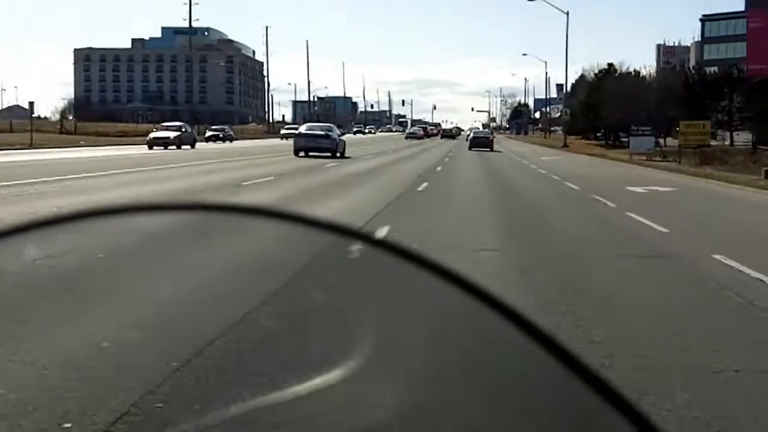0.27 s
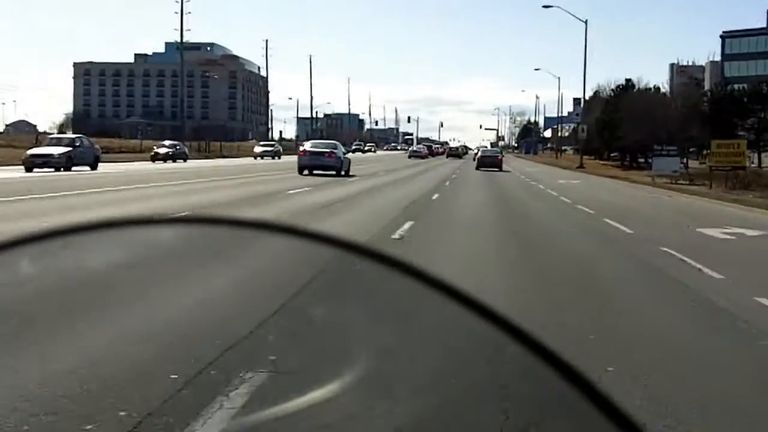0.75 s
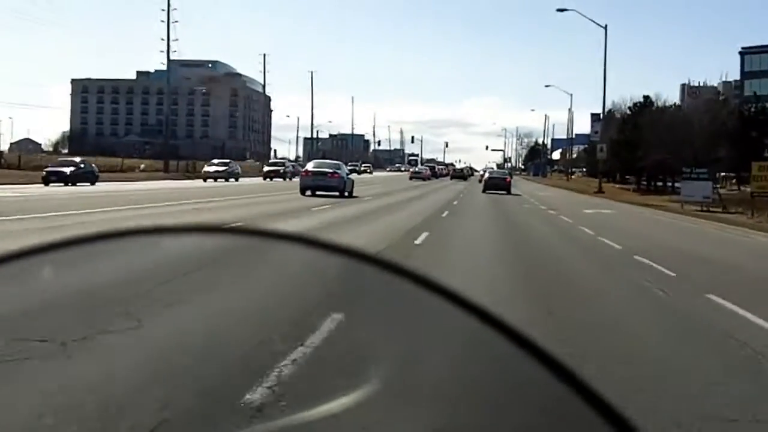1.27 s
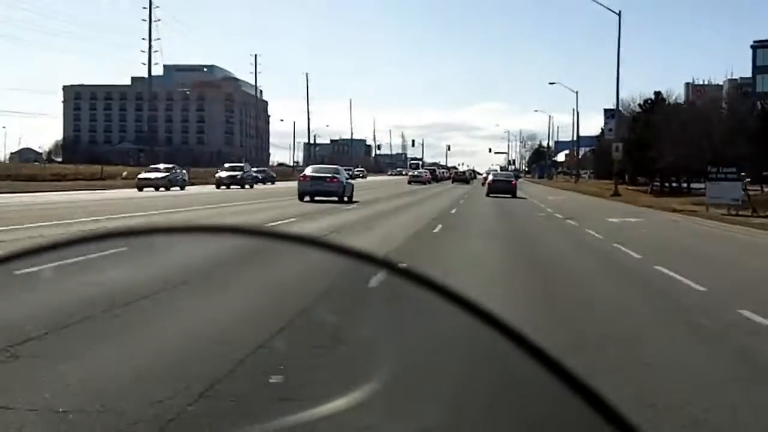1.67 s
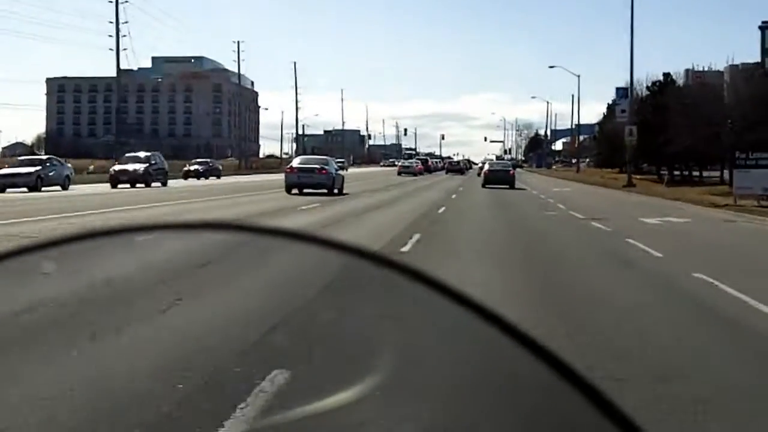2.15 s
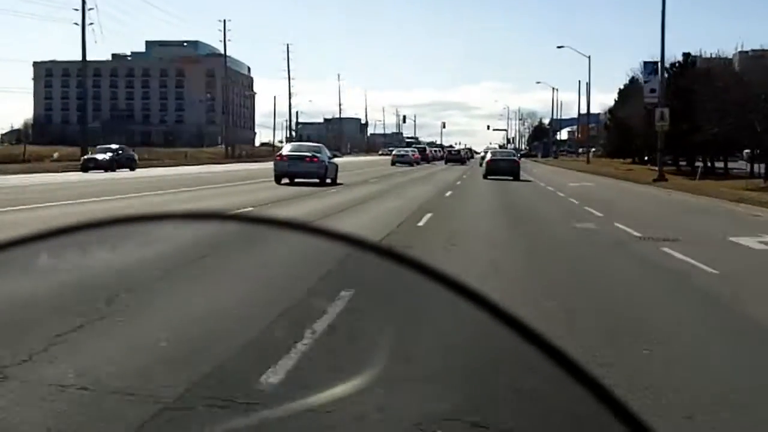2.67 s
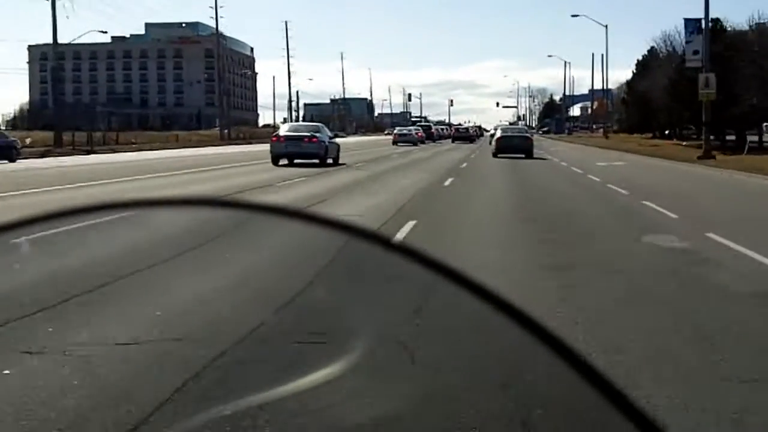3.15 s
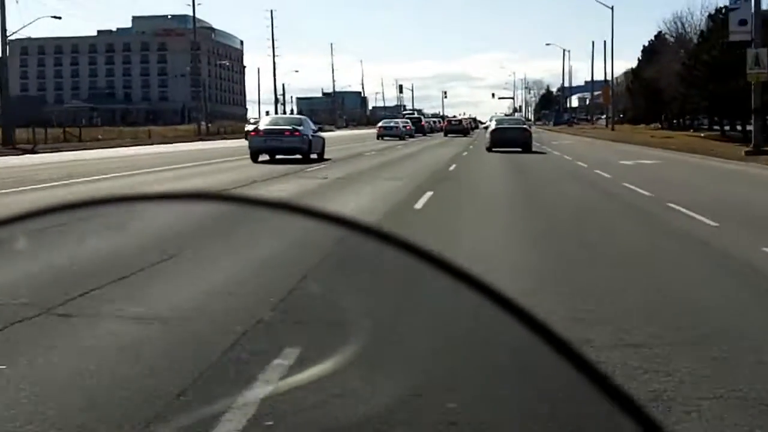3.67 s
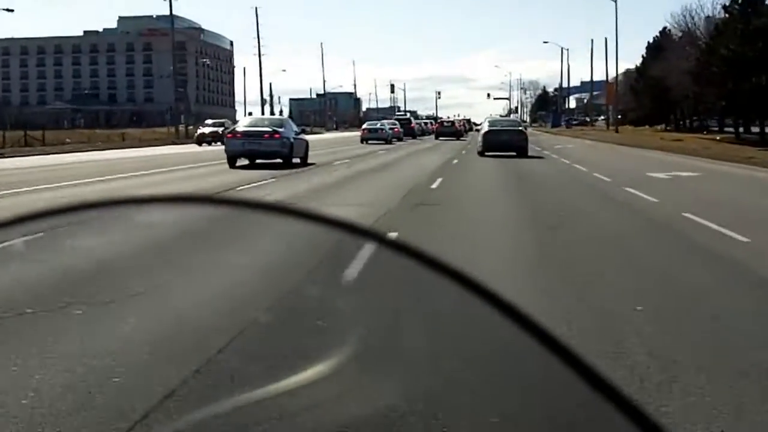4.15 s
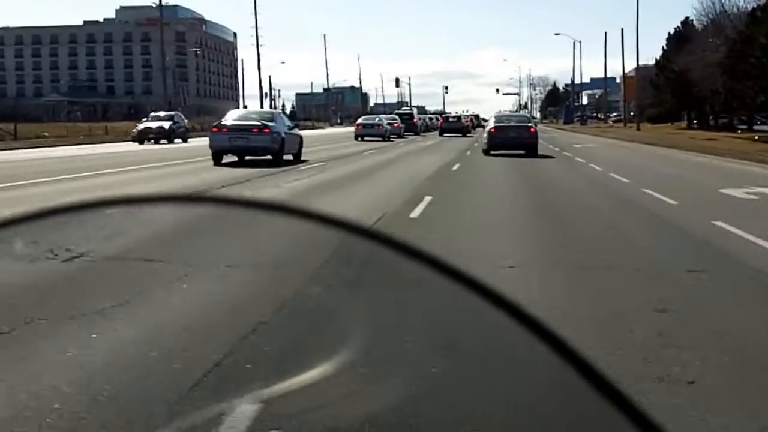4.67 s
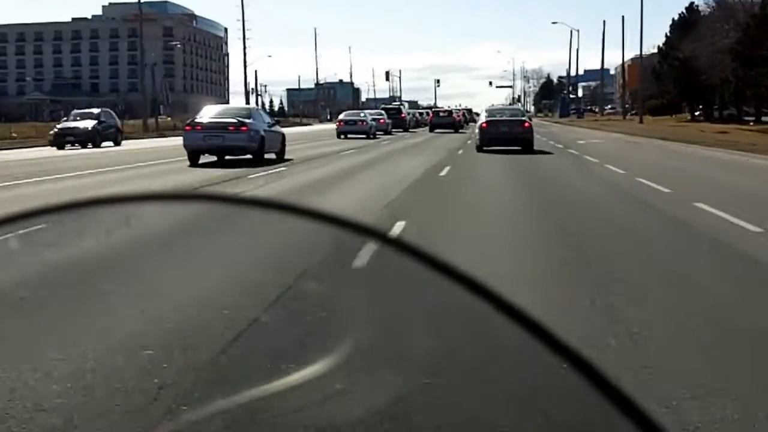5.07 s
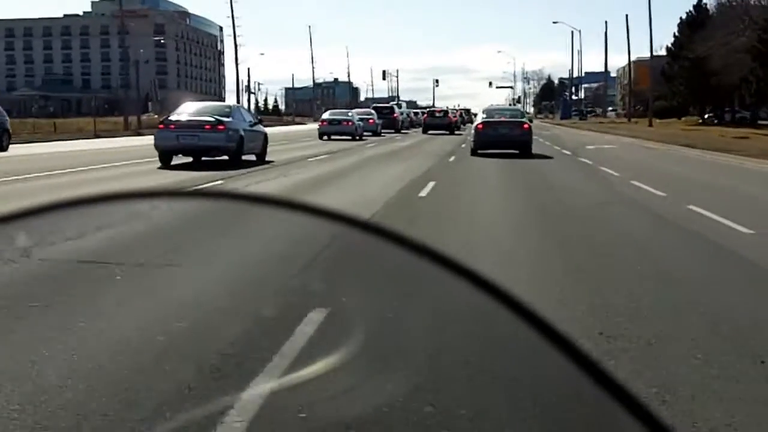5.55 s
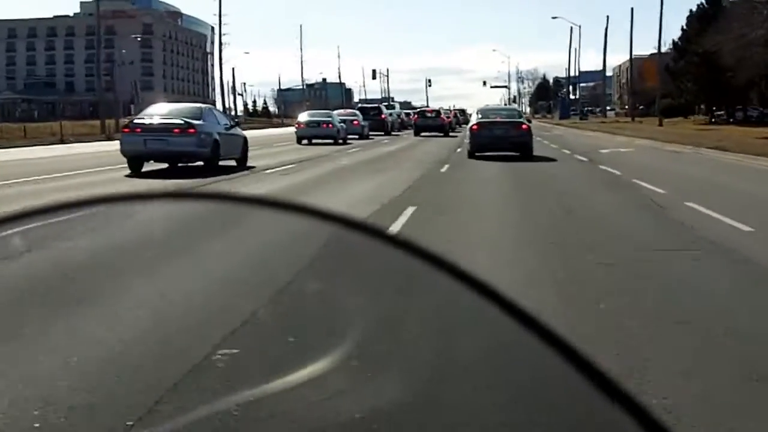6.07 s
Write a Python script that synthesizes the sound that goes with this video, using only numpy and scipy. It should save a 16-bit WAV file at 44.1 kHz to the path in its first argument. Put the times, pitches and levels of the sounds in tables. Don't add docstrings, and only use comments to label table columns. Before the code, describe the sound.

A four-cylinder motorcycle booms and growls at cruise, then slows on a closed throttle, its pitch sinking while wind buffets the microphone.

```python
import sys
import numpy as np
from scipy import signal
from scipy.fft import rfft, irfft, next_fast_len
from scipy.io import wavfile
from scipy.ndimage import uniform_filter1d, map_coordinates

SR = 44100
rng = np.random.default_rng(int(sys.argv[2]) if len(sys.argv) > 2 else 0)


def volts(x):
    e = np.asarray(x, float) / 20
    return 10 ** e


def persist_wave(psi):
    counts = np.round(np.clip(psi, -1, 1) * 32767).astype(np.int16)
    wavfile.write(sys.argv[1], SR, np.atleast_2d(counts).T)


N = 278271
T = np.arange(N) / SR

# [pitch_hz, level_db per Hz]
BODYWORK = [(290, -41), (500, -4.5), (960, -3), (1080, -12.5), (1260, -2), (1560, -2), (1720, -14),
            (2040, -9.5), (2350, -5), (3300, -7), (4140, -15), (5200, -12.5), (8910, -25), (10300, -30),
            (14800, -46)]
# [pitch_hz, level_db]
SILENCER_MODES = [(225, 11.5), (293, 14.5), (315, 6), (360, 4.5), (405, -5.5), (445, 15), (490, 2),
                  (525, 4.5)]
# [centre_s, loss_db, half_length_s]
CAPSULE_DULLED = [(.33, -1, 0.017), (.63, -3, .05), (1.14, -4.5, 0.046), (1.86, -2, 0.049),
                  (2.35, -6.5, 0.041), (2.66, 0, 0.048), (2.81, -9, 0.019), (4.14, -3.5, .09),
                  (4.38, -3, 0.05), (4.76, 0, 0.02), (5.39, -3.5, 0.025), (5.53, 0, 0.022),
                  (5.86, -0.5, 0.044), (6.24, -7.5, 0.026), (6.31, -6.5, 0.062)]
PUMP_ORDER = 59 / 16


def engine():
    # [time_s, firing_hz]
    speed = [(0, 265), (.2, 257.1), (.5, 249.5), (.72, 256.9), (.8, 247.5), (.88, 250), (1.3, 250.2),
             (1.9, 260.3), (2.2, 258.8), (2.5, 259.3), (2.8, 254.3), (3.25, 243.2), (3.7, 227.3),
             (4.3, 208.2), (4.9, 188.1), (5.35, 173.2), (5.95, 151.4), (6.31, 140.6)]
    # [time_s, throttle 0-1, running_noise_db, uneven_burning 0-1]
    rider = [(0, 0.2, -37.5, 0.07), (.28, 0, -40, 0.1), (.52, 0.18, -42.5, 0.31), (.535, 0.5, -42.5, 0.37),
             (.74, 0.82, -41, 0.3), (.8, 0.52, -40, 0.14), (1.3, 0.49, -41, 0.18), (1.45, 0.62, -40, .04),
             (2.2, 0.7, -38.5, 0), (2.75, 0.7, -40, 0.16), (3.0, .2, -40.5, 0.04), (3.17, 0.13, -41, 0.27),
             (3.27, 0.21, -40.5, 0), (3.8, 0.03, -44.5, 0), (4.5, 0.23, -44, 0), (5.3, 0.06, -45, 0.1),
             (5.8, 0, -47, 0.08), (6.31, 0.04, -43.5, 0.14)]
    # [time_s, load 0-1]
    breathing = [(0, 0), (.2, 0.63), (.45, 0.56), (.6, 0.74), (.75, 0.94), (.82, 0.67), (1.25, 0.5),
                 (1.4, 0.91), (2.0, 0.74), (2.65, 0.63), (2.85, 0.4), (3.3, 0.1), (3.6, 0.6), (3.95, 0.63),
                 (4.15, 0.25), (4.35, 0.54), (5.2, 0), (6.1, 0.1)]
    hz, = curves(speed)
    throttle, running_db, uneven = curves(rider)
    load, = curves(breathing)
    firings = np.cumsum(hz) / SR
    turn = 2 * np.pi * firings
    return (exhaust(hz, turn, throttle, running_db, uneven)
            + growl(hz, turn, load, running_db)
            + pipe(hz, firings, load, running_db)
            + valve_ticks(firings, throttle, running_db)
            + clatter(firings, running_db)
            + gear_whine(hz, turn, running_db)
            + pump(hz, turn, running_db)
            + pump_teeth(turn, throttle, running_db))


def exhaust(hz, turn, throttle, running_db, uneven):
    # [firing_hz, level_db over the running noise]
    boom_response = [(140, 3), (160, 10.5), (185, 18), (200, 24.5), (215, 26.5), (230, 29), (248, 23),
                     (265, 21.5)]
    boom_db = between(throttle, 0, -10) + along(boom_response, hz) + 3.5
    octave_db = between(throttle, 0, 7.5) + along(SILENCER_MODES, 2 * hz) + 2.5
    boom = volts(running_db + boom_db) * np.imag(shaken(uneven) * np.exp(1j * turn))
    octave = volts(running_db + octave_db) * np.imag(shaken(uneven) * np.exp(2j * turn))
    return boom + octave


def shaken(uneven):
    return 1 + uneven * (wobble(rate=65) + 1j * wobble(rate=70))


def growl(hz, turn, load, running_db):
    orders = [2.5, 3, 3.5, 4]
    # [idle_db, loaded_db]
    order_levels = [(-16.5, 0.5), (-12, -0.5), (-20.5, -10), (-8.5, -5)]
    # [pitch_hz, level_db]
    airbox = [(440, 7), (520, -1), (635, -2.5), (700, 1), (750, -8), (772, -1), (885, 1.5), (1030, -1)]
    total = growl_order(1.5, turn, load, running_db - 15 + along(SILENCER_MODES, 1.5 * hz))
    for k, (idle_db, loaded_db) in zip(orders, order_levels):
        level_db = running_db + between(load, idle_db, loaded_db) + along(airbox, k * hz)
        total = total + growl_order(k, turn, load, level_db)
    return total


def growl_order(k, turn, load, level_db):
    unloaded_db = (1 - load) * (3 * wobble(rate=4) - 4)
    gain = volts(level_db + 7.5 + wobble(rate=10) + unloaded_db)
    return gain * np.sin(k * turn + .15 * wobble(rate=20))


def pipe(hz, firings, load, running_db):
    # [pitch_hz, level_db]
    pipe_colour = [(600, -63.5), (1100, 2), (1310, 11.5), (1440, 7.5), (1570, -4), (1780, 9), (2300, -20),
                   (2890, 1.5), (3860, -29.5), (6000, -6.5), (13200, -120)]
    db_per_octave, cruise_hz = 13, 251
    level_db = between(load, -3, -4) + db_per_octave * np.log2(hz / cruise_hz) + 2.5
    blows = scattered(pulses(firings, jitter_s=.00001, scatter_db=4.5), t60=0.02)
    return volts(running_db + level_db) * coloured(blows, pipe_colour)


def pulses(firings, jitter_s, scatter_db):
    cylinder_sizes = [0.19, 1, 0.54, 0.93]
    count = np.arange(1, int(firings[-1]))
    chance = rng.standard_normal((2, len(count)))
    at = np.interp(count, firings, T * SR) + jitter_s * SR * chance[0]
    return impulses(at, np.array(cylinder_sizes)[count % 4] * volts(scatter_db * chance[1]))


def valve_ticks(firings, throttle, running_db):
    # [pitch_hz, width_hz, lift_db]
    fairing_modes = [(915, 74, 6.5), (1144, 990, 11), (1548, 51, 8.5), (2335, 100, 9.5), (3060, 72, 13),
                     (3450, 110, 13), (5115, 1300, 11.5)]
    # [pitch_hz, level_db]
    thin_bass = [(700, -8), (1100, 1)]
    hz = np.geomspace(290, 14800, num=500)
    lift = sum(up / (1 + (2 * (hz - centre) / width) ** 2) for centre, width, up in fairing_modes)
    colour_db = along(BODYWORK, hz) + lift + along(thin_bass, hz)
    blows = scattered(seatings(firings, jitter_s=.000008, drift_db=1.0), t60=0.045)
    return volts(running_db + between(throttle, 0.5, 0)) * coloured(blows, np.c_[hz, colour_db])


def seatings(firings, jitter_s, drift_db):
    valve_seats = [(.031, 0.51), (0.117, 0.72), (0.274, 0.32), (0.376, 1), (0.538, 0.18), (0.609, 0.16),
                   (0.781, 0.14), (0.865, 0.97)]
    share, size = np.transpose(valve_seats)
    cycle = np.arange(int(firings[-1] / 4))[:, None]
    chance = rng.standard_normal((2, len(cycle), len(share)))
    at = np.interp(4 * (cycle + share), firings, T * SR) + jitter_s * SR * chance[0]
    drift = volts(drift_db * unit(uniform_filter1d(chance[1], size=9, axis=0)))
    return impulses(at.ravel(), (size * drift).ravel())


def clatter(firings, running_db):
    gate_sizes = [0.52, 0.99, 0.98, 0.38]
    gate = 1.1 + np.array(gate_sizes)[firings.astype(int) % 4] * np.exp(-3.5 * (firings % 1))
    tremor = volts(0.15 * wobble(rate=67) + 0.6 * wobble(rate=35))
    return volts(running_db + 3.5) * coloured(gate * tremor * patchy(1.37, 3, 12), BODYWORK)


def gear_whine(hz, turn, running_db):
    # [pitch_hz, level_db]
    gear_case = [(1500, -40), (2300, -30), (2420, -17), (2560, -25), (2750, -17), (2810, -10), (2840, -4),
                 (2930, -6)]
    order = 11
    gain = volts(running_db + along(gear_case, order * hz) + 7 + wobble(rate=25))
    return gain * np.sin(order * turn + .35 * wobble(rate=30))


def pump(hz, turn, running_db):
    # [pitch_hz, level_db]
    pump_response = [(520, -24), (650, -2.5), (760, -3.5), (900, -2.5), (922, -28.5), (950, 1.5),
                     (975, -31)]
    gain = volts(running_db + along(pump_response, PUMP_ORDER * hz) + 1.1 * wobble(rate=5.9))
    return gain * np.sin(PUMP_ORDER * turn)


def pump_teeth(turn, throttle, running_db):
    gain = volts(running_db + between(throttle, -21.5, -34) + 2 + 3 * wobble(rate=10))
    return gain * np.sin(4 * PUMP_ORDER * turn + .5 * wobble(rate=25))


def panel():
    # [centre_s, half_length_s, pitch_hz, level_db]
    squeals = [
        (3.24, 0.055, 2922, -48),
    ]
    total = 0
    for s, half, hz, db in squeals:
        swell = volts(db + 11 + 1.5 * wobble(rate=21)) * np.exp(-((T - s) / half) ** 4)
        total = total + swell * np.sin(2 * np.pi * hz * T + .5 * wobble(rate=35))
    return total


def wind():
    # [time_s, strength_db, eddy_db behind the screen]
    gusts = [(0, -30, 5), (.24, -29.5, -3.5), (.33, -34.5, 10), (.52, -35, 4.5), (.56, -35.5, 5),
             (.9, -34, -2), (1.25, -32.5, -8), (1.6, -31, -5.5), (2.25, -28.5, 0), (2.5, -29, 0.5),
             (3.0, -29.5, 6.5), (3.3, -32, 3), (3.95, -35.5, 6.5), (4.15, -33, -3), (4.55, -32, -1.5),
             (5.04, -37, -1), (5.6, -32, -6.5), (6.31, -34, 0)]
    strength_db, eddy_db = curves(gusts)
    return buffet(strength_db) + flutter(strength_db + eddy_db) + roar(strength_db + 0.4 * eddy_db)


def buffet(level_db):
    # [pitch_hz, level_db per Hz]
    buffet_colour = [(5, -1), (12, 6), (30, -1.5), (70, -3), (130, -10.5), (250, -33), (600, -60.5)]
    lumps = volts(0.22 * wobble(rate=21.0)) * patchy(1.0, 2, 10)
    return volts(level_db + 4.5) * coloured(lumps, buffet_colour)


def flutter(level_db):
    # [pitch_hz, level_db per Hz]
    flutter_colour = [(30, -49), (80, 0.5), (150, 0), (250, -2), (450, -13), (900, -23.5), (2000, -65)]
    eddies = volts(1.5 * wobble(rate=37)) * patchy(0.3, 2, 10)
    return volts(level_db - 5 + 4.5) * coloured(eddies, flutter_colour)


def roar(level_db):
    # [pitch_hz, level_db per Hz]
    roar_colour = [(120, -65), (250, 0), (400, 2), (700, -12.5), (1200, -6), (2500, -58)]
    return volts(level_db - 5.5 - 3.5) * coloured(patchy(2.2, 3, 10), roar_colour)


def pressure():
    # [centre_s, share of full scale, half_length_s]
    swings = [(.13, -.055, .04), (.33, -.085, .04), (.63, -.04, .06), (.79, .07, .07), (.93, .035, .03),
              (1.12, -.07, .05), (1.85, -.045, .04), (2.0, .045, .06), (2.18, .07, .04), (2.33, -.14, .045),
              (2.43, .12, .025), (2.56, .125, .05), (2.68, -.085, .035), (2.8, -.12, .04), (2.92, .07, .04),
              (3.1, .05, .1), (3.41, -.055, .04), (4.08, -.055, .05), (4.38, -.035, .03), (4.47, .1, .04),
              (4.85, -.035, .09), (4.99, .035, .025), (5.31, .05, .025), (5.38, -.045, .04),
              (5.48, .06, .03), (5.65, .065, .035), (5.84, .06, .04), (6.02, .035, .03), (6.22, -.105, .04)]
    return -.0077 + bumps(swings)


def starved(x):
    # [time_s, threshold_db]
    threshold_moves = [(0, -4), (.6, -3), (.75, 1), (2.1, 3), (2.2, -2), (4.1, -6.5), (4.3, -3), (5.7, -4),
                       (6.31, -9)]
    # [pitch_hz, level_db]
    weak_treble = [(6500, -88), (8100, -77.5), (9300, -84), (10100, -79), (10700, -87), (11800, -90),
                   (12400, -87), (12900, -93), (14300, -93), (15000, -84)]
    hz, t, z = signal.stft(x, SR, nperseg=1024)
    level = np.sqrt(np.abs(uniform_filter1d(np.abs(z) ** 2, size=4, axis=0)))
    bands = uniform_filter1d(rng.standard_normal(z.shape), size=30, axis=0)
    flicker_db = 1.5 * rng.standard_normal(len(t)) + 2.5 * unit(bands)
    follow_db = np.interp(t, *np.transpose(threshold_moves)) + np.interp(t, T, bumps(CAPSULE_DULLED))
    shape_db = np.interp(hz, *np.transpose(weak_treble), left=-200)[:, None]
    limit = volts(shape_db + follow_db + flicker_db)
    return signal.istft(z * np.where(level > limit, 1, .03), SR, nperseg=1024)[1][:N]


def scattered(x, t60):
    t = T[:SR // 20]
    smear = rng.standard_normal(len(t)) * volts(-60 * t / t60)
    return unit(signal.fftconvolve(x, smear)[:N])


def impulses(at, size):
    at = np.clip(at, 9, N - 9)
    taps = at.astype(int)[:, None] + np.arange(-7, 9)
    offset = taps - at[:, None]
    shape = np.sinc(offset) * np.cos(np.pi * offset / 16) ** 2
    return np.bincount(taps.ravel(), (size[:, None] * shape).ravel(), N)


def patchy(depth_db, tall, long):
    z = signal.stft(rng.standard_normal(N), nperseg=512)[2]
    field = uniform_filter1d(rng.standard_normal(z.shape), tall, 0)
    field = uniform_filter1d(field, long, 1)
    return signal.istft(z * volts(depth_db * unit(field)), nperseg=512)[1][:N]


def coloured(x, points):
    m = 2 * next_fast_len(N // 2 + SR // 2)
    f, db = np.transpose(points)
    gain_db = np.interp(np.log(np.fft.rfftfreq(m, 1 / SR) + 1), np.log(f + 1), db)
    cepstrum = irfft(gain_db * np.log(10) / 20, m)
    cepstrum[1:m // 2] *= 2
    cepstrum[m // 2 + 1:] = 0
    return unit(irfft(rfft(x, m) * np.exp(rfft(cepstrum)), m)[:N])


def wobble(rate):
    return unit(map_coordinates(rng.standard_normal(2800), [T * rate]))


def between(amount, low_db, high_db):
    return low_db + amount * (high_db - low_db)


def along(points, hz):
    f, v = np.transpose(points)
    return np.interp(np.log(hz), np.log(f), v)


def curves(rows):
    s, *cols = np.transpose(rows)
    return [np.interp(T, s, c) for c in cols]


def bumps(rows):
    return sum(height * np.exp(-((T - s) / half) ** 2) for s, height, half in rows)


def unit(x):
    return x / np.sqrt(np.mean(x ** 2) + 1e-20)


def scene():
    heard = engine() + panel() + wind()
    return (volts(bumps(CAPSULE_DULLED)) * heard + pressure())[None]


def band_limit(x):
    return signal.sosfilt(signal.butter(12, 15000, fs=SR, output="sos"), x)


def record(dry):
    bent = dry[0] + .1 * dry[0] ** 2 - .007
    return band_limit(starved(bent)[None])


dry = scene()
out = record(dry)
persist_wave(out)
```